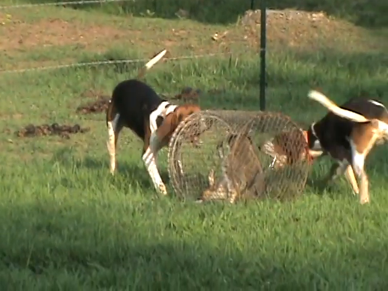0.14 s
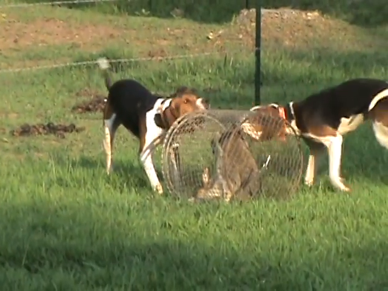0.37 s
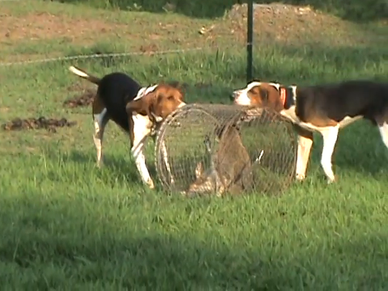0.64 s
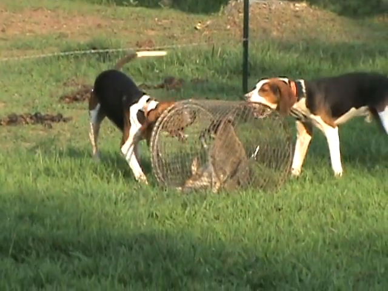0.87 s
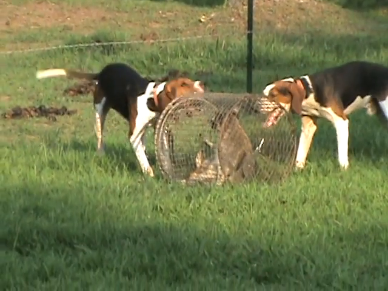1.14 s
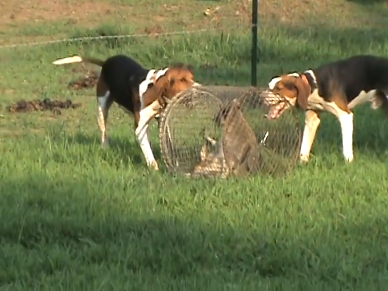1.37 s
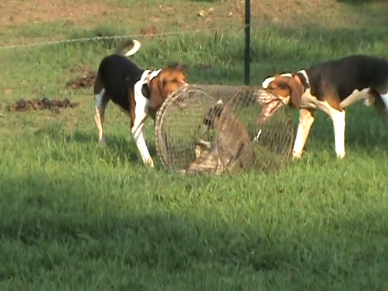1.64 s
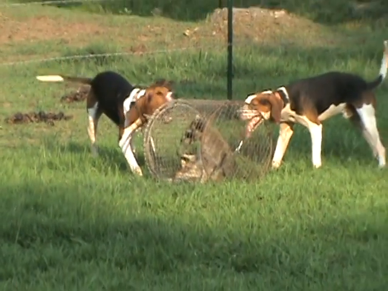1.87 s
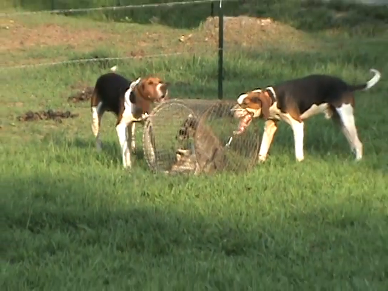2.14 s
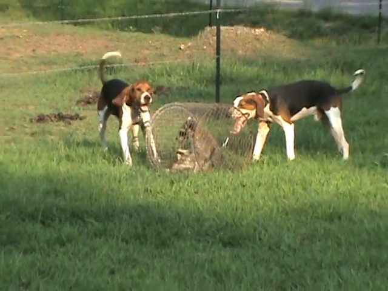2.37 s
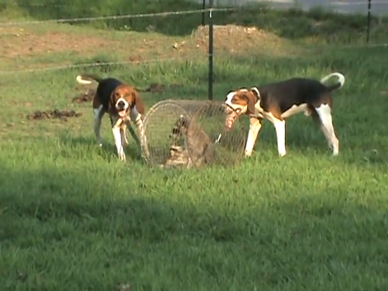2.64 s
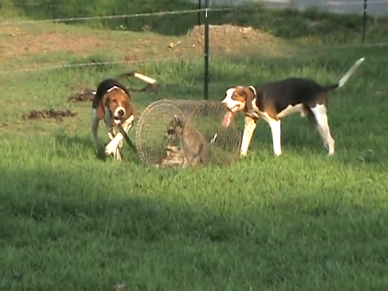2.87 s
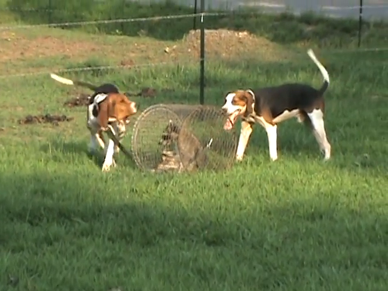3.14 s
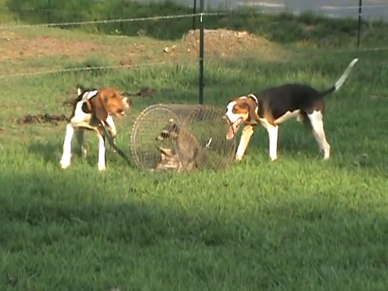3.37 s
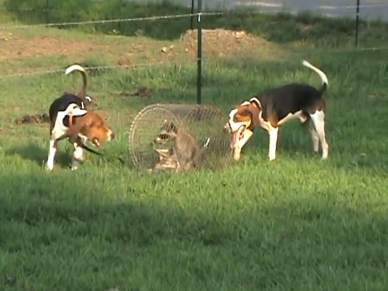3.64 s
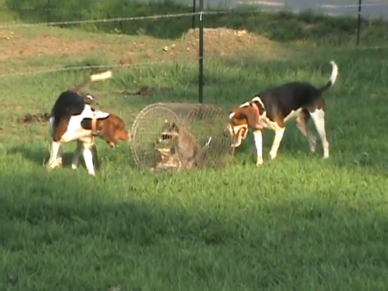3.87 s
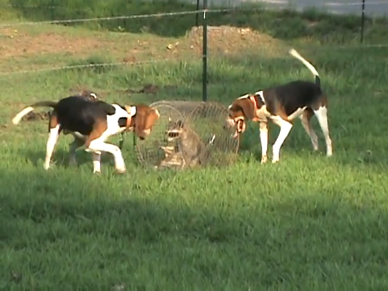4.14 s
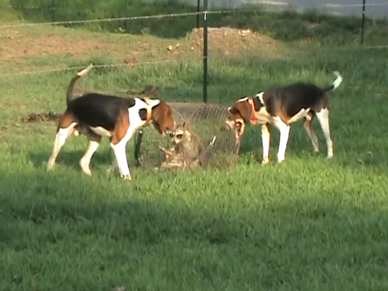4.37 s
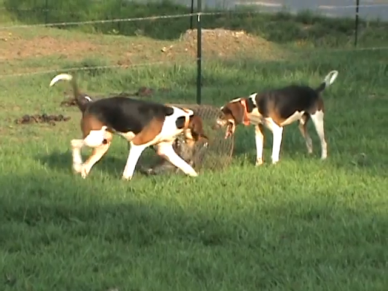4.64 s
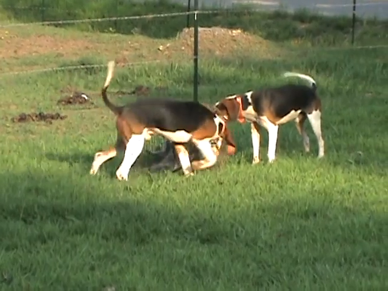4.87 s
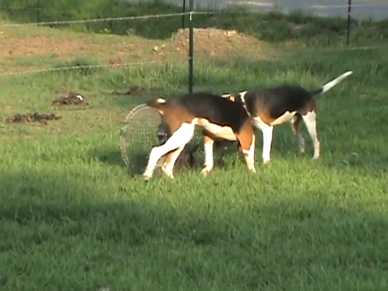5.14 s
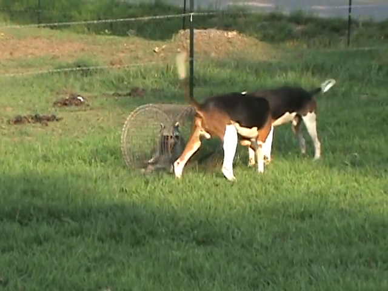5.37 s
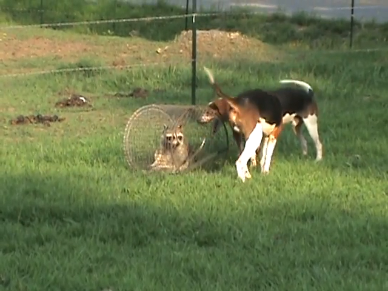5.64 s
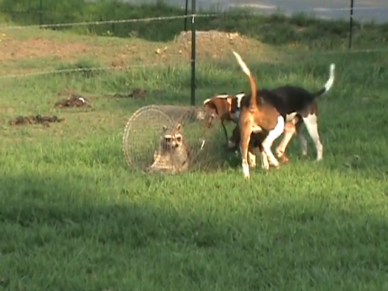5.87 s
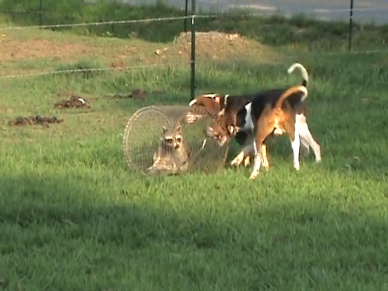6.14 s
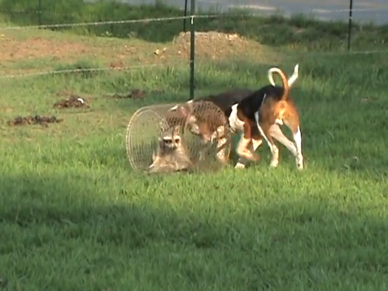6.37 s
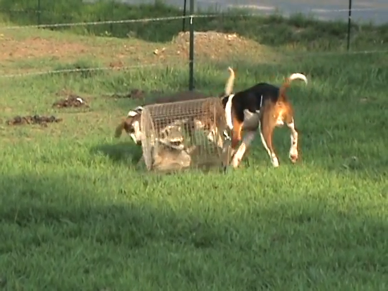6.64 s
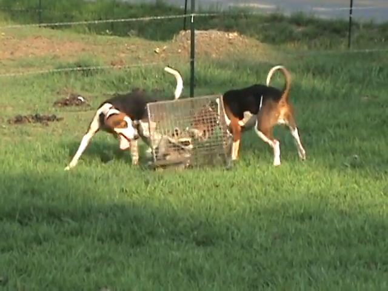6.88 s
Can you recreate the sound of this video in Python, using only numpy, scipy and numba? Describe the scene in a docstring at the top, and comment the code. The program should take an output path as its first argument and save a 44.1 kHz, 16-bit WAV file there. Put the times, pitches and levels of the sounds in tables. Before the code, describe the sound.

Two hounds a few metres away bark at a caged raccoon on an open lawn. Clear high yelps crack into hoarse chest barks that drop off fast; a long bay comes early and a shorter, higher one midway. The nearer dog is loud, the other weaker. Trees return a dull echo. Small birds chirp, insects hiss, traffic hums faintly. Stereo outdoor microphone, dogs slightly left.

```python
"""An open lawn, hounds a few metres from the microphone: most barks start as a clear high yelp, break into a
hoarse chest voice near 500 Hz and fall away, and two calls are bays; uneven fold pulses ring in throat
and mouth. Trees and banks answer with a long dull echo of decaying noise. Small birds chirp as gliding
whistles; crickets and cicadas hiss high up, the wire cage ticks once and distant traffic hums, all as
filtered noise."""
import sys
import numpy as np
from scipy import signal
from scipy.fft import rfft, irfft, next_fast_len
from scipy.io import wavfile
from scipy.ndimage import uniform_filter1d, minimum_filter1d
from numba import njit

SR = 44100
rng = np.random.default_rng(int(sys.argv[2]) if len(sys.argv) > 2 else 0)


def inscribe(sig):
    """Save sig as 16-bit PCM at rate SR to the path in sys.argv[1].

    A 1-D sig is mono; a 2-D sig holds one channel per row.
    Samples are clipped to [-1, 1] before scaling.
    """
    pcm = np.round(np.clip(np.atleast_2d(sig).T, -1, 1) * 32767)
    wavfile.write(sys.argv[1], SR, pcm.astype(np.int16))


def undo_db(level):
    """Turn decibels back into plain size, where 20 dB means ten times bigger."""
    steps = np.asarray(level, float) / 20
    return 10 ** steps


N = 308700
T = np.arange(N) / SR
EDGE_S = 0.008  # each call and chirp is held this long past both ends of its curve


def unit(x):
    """Scale to rms 1."""
    return x / np.sqrt(np.mean(x ** 2, axis=-1, keepdims=True))


def shaped(gain, count, channels=1):
    """Noise of rms 1 whose spectrum is gain(Hz)."""
    size = next_fast_len(count)
    hz = np.arange(size // 2 + 1) * SR / size + 1
    spectrum = rfft(rng.standard_normal((channels, size))) * gain(hz)
    return unit(irfft(spectrum, size)[:, :count])


def bell(hz, centre_hz, width_hz):
    """Gain of a resonance, 1 at its centre."""
    return 1 / np.sqrt(1 + ((hz - centre_hz ** 2 / hz) / width_hz) ** 2)


def on_log(hz, table):
    """Read (Hz, value) points on a log-frequency axis."""
    table_hz, values = np.transpose(table)
    return np.interp(np.log(hz), np.log(table_hz), values)


def columns(rows):
    """Curve rows as one array per column, sample by sample, held a little past both ends."""
    s, *rest = np.transpose(rows)
    t = np.arange(int((s[0] - EDGE_S) * SR), int((s[-1] + EDGE_S) * SR)) / SR
    return [np.interp(t, s, column) for column in rest]


def add(out, rows, sound, pan_db, fade_s):
    """Mix a sound in around its curve's span with soft ends; pan_db is left minus right."""
    at = int((rows[0][0] - EDGE_S) * SR)
    t = np.arange(len(sound)) / SR
    fade = np.sin(np.pi / 2 * np.clip(np.minimum(t, t[-1] - t) / fade_s, 0, 1))
    sides = undo_db(np.array([[pan_db], [-pan_db]]) / 2)
    out[:, at:at + len(sound)] += sound * fade * sides


@njit
def resonate(x, hz, width):
    """State-variable band-pass whose centre moves sample by sample, gain 1 at the centre."""
    y, band, low = np.empty(len(x)), 0., 0.
    for i in range(len(x)):
        g, k = np.tan(np.pi * hz[i] / SR), width / hz[i]
        v = (band + g * (x[i] - low)) / (1 + g * (g + k))
        band, low, y[i] = 2 * v - band, low + 2 * g * v, k * v
    return y


# Spectrum of the open air across the lawn. Each row: frequency in Hz, relative density in dB.
AIR_SPECTRUM = [(15, -36), (25, -11), (99, 2.5), (500, -3), (604, 1), (812, 5.5), (981, -3.5), (1680, 2.5),
                (2260, -5.5), (5520, -15.5), (7420, 4), (8730, -4.5), (15800, -21)]
# How alike the air is at the left and right microphone. Each row: frequency in Hz, likeness from 0 to 1.
AIR_LIKENESS = [(60, 1), (290, 0.36), (1400, 0.66), (3100, 0), (6800, 0.74), (15000, 0.66)]
AIR_DB = -48


def air():
    """Traffic, leaves and cicadas: octave-wide noise parts that waver alone, each partly shared by the sides."""
    out = 0
    every_hz = np.arange(20., 16000)
    total = np.sqrt(np.sum(undo_db(on_log(every_hz, AIR_SPECTRUM)) ** 2))
    for centre in 30 * 2 ** np.arange(0, 9.5, .5):
        def part(f):
            octave = np.cos(np.pi / 2 * np.clip(2 * np.log2(f / centre), -1, 1))
            return undo_db(on_log(f, AIR_SPECTRUM)) * octave

        mid, side = shaped(part, N, channels=2)
        like = np.clip(on_log(centre, AIR_LIKENESS), 0, 1)
        waver = undo_db(1.55 * shaped(lambda f: bell(f, 13, 33), N)[0])
        pair = np.sqrt((1 + like) / 2) * mid + np.sqrt((1 - like) / 2) * side * np.array([[1], [-1]])
        out = out + pair * waver * np.sqrt(np.sum(part(every_hz) ** 2)) / total
    return undo_db(AIR_DB) * out


# A far engine swells and fades. Each row: time in seconds, level in dB.
ENGINE_SWELL = [(0.0, -66.5), (1.9, -71.5), (2.3, -61.5), (3.1, -67), (3.5, -75), (7.0, -69.5)]


def hum():
    """Distant traffic: a narrow band of noise near 101 Hz."""
    return undo_db(np.interp(T, *np.transpose(ENGINE_SWELL))) * shaped(lambda f: bell(f, 101.0, 40) ** 2, N)


def cricket_chorus():
    """A far chorus merges into a faint narrow noise band near 4 kHz whose level trembles."""
    level = undo_db(-70.5 + 2 * shaped(lambda f: bell(f, 1.5, 3.4), N))
    return level * shaped(lambda f: bell(f, 4120, 250) ** 2, N)


def cicadas():
    """A thin buzz of noise near 14 kHz that swells late."""
    level = undo_db(-64.5 + 5.0 * np.clip((T - 5.7) / .6, 0, 1))
    return level * shaped(lambda f: bell(f, 14300, 4500) ** 2, N)


# Upper resonances of the hounds' heads. Each row: centre in Hz, width in Hz, relative level in dB.
UPPER_RESONANCES = [(3100, 700, 0), (4500, 600, -3), (5600, 700, -1), (6800, 900, -2), (8700, 1800, -8),
                    (12000, 5000, -19)]
THROAT_WIDTH_HZ, MOUTH_WIDTH_HZ = 530, 1306  # scaled by each call's own width factor
WANDER_SHARE = .06  # pitch wander for each radian of hoarseness


def upper_resonances(rush):
    """Fixed treble resonances; each flares and fades by itself as tongue and lips move."""
    flare_db = 2.5 * shaped(lambda f: bell(f, 8, 18) ** 2, len(rush), channels=len(UPPER_RESONANCES))
    top = 0
    for n, (centre, width, db) in enumerate(UPPER_RESONANCES):
        centre_hz, width_hz = np.full(len(rush), float(centre)), float(width)
        ringing = resonate(resonate(rush, centre_hz, width_hz), centre_hz, width_hz)
        top = top + (-1) ** n * undo_db(db + flare_db[n]) * ringing
    return unit(top)


def voice(rows, hoarse, half_db, break_s, wide):
    """Uneven fold pulses ring through throat, mouth and upper resonances.

    Each row: time in seconds, pitch in Hz, level in dB, throat in Hz, mouth in Hz, mouth in dB, treble in dB."""
    hz, level_db, throat_hz, mouth_hz, mouth_db, treble_db = columns(rows)
    count = len(hz)
    hz = hz * (1 + WANDER_SHARE * hoarse * shaped(lambda f: bell(f, 14, 25) ** 2, count)[0])
    slip, flutter = shaped(lambda f: bell(f, 40, 110) ** 2, count, channels=2)
    throat_width, mouth_width = wide * THROAT_WIDTH_HZ, wide * MOUTH_WIDTH_HZ
    broken = np.clip(np.arange(count) / SR / max(break_s, 1e-4), 0, 1) ** 2
    # as the pitch falls low the throat closes down onto it
    held = np.clip((hz - 390) / 35, 0, 1)
    throat_hz = hz + (throat_hz - hz) * held
    # the rasp comes in bursts with clearer moments between
    bursts = undo_db(4 * shaped(lambda f: bell(f, 15, 25) ** 2, count)[0] - 1)
    hoarse = hoarse * bursts * broken * (.3 + .7 * held)
    # folds that close early or late smear the upper lines most
    phase = 2 * np.pi * np.cumsum(hz) / SR + hoarse * slip
    folds, low_power, high_power = 0, 0, 0
    for k in np.arange(.5, 13000 / hz.max(), .5):
        # half-pitch lines make every second cycle differ
        line = 1 if k % 1 == 0 else undo_db(half_db) * broken
        folds = folds + line * np.sqrt(2) * np.cos(k * phase)
        low_power = low_power + (line * bell(k * hz, throat_hz, throat_width) ** 2) ** 2
        high_power = high_power + (line * bell(k * hz, mouth_hz, mouth_width) ** 3) ** 2
    shimmer = .9 * hoarse + .05
    folds = folds * (1 + shimmer * flutter) / np.sqrt(1 + shimmer ** 2)
    low = resonate(resonate(folds, throat_hz, throat_width), throat_hz, throat_width)
    high = folds
    for _ in range(3):
        high = resonate(high, mouth_hz, mouth_width)
    # air rushes through once a cycle and joins the pulses in the treble
    breath = .85 * rng.standard_normal(count) * (1 + .8 * np.cos(phase))
    top = upper_resonances(unit(folds) + breath)
    mouth = np.clip(undo_db(mouth_db), 0, .97)
    body = np.sqrt(1 - mouth ** 2) * low / np.sqrt(low_power) - mouth * high / np.sqrt(high_power)
    # little passes the muzzle between the mouth resonance and the upper ones
    body = signal.sosfilt(signal.butter(5, 2350, fs=SR, output="sos"), body)
    return undo_db(level_db) * (body + undo_db(treble_db) * top)


# The near and the far hound. Each entry: left minus right in dB, chest mouth resonance in Hz,
# share of pitch left after the fall, start of a yelp against its attack's end in dB.
HOUND = {"near": (2, 1537, 0.58, -3), "far": (4, 1352, 0.86, -4)}
YELP_ATTACK_S, YELP_THROAT_HZ, OPEN_MOUTH_HZ = .018, 668, 1784


def clear_note(who, start, end, first_hz, held_hz, last_hz, peak_db, end_db, mouth_db, treble_db):
    """The throat follows the pitch; the mouth of a high yelp rings on its second line, else it stays open."""
    s = np.array([start, start + YELP_ATTACK_S, end])
    hz = np.array([first_hz, held_hz, last_hz])
    mouth = 2 * hz if held_hz > 560 else OPEN_MOUTH_HZ + 0 * hz
    level = [peak_db + HOUND[who][3], peak_db, end_db]
    throat = np.maximum(hz, YELP_THROAT_HZ)
    return np.transpose([s, hz, level, throat, mouth, mouth_db + 0 * s, treble_db + 0 * s])


# Clear notes: high yelps, and two low open-mouthed notes near 460-490 Hz. Each row: hound,
# start in seconds, end in seconds, first pitch in Hz, pitch after the attack in Hz, last pitch in Hz,
# level after the attack in dB, end level in dB, mouth in dB, treble in dB.
CLEAR_NOTES = [("near", .123, .15, 725, 790, 815, -19.5, -25, -6.5, -20.5),
               ("near", .138, .195, 660, 630, 586, -22.5, -12.5, -17, -26.5),
               ("near", .194, .241, 736, 780, 848, -19, -18.5, -4, -25),
               ("near", 0.95, .998, 750, 772, 786, -20, -24.5, -4, -18),
               ("near", 1.005, 1.038, 457, 463, 467, -8, -17, -1.3, -22),
               ("far", 1.544, 1.598, 700, 690, 606, -27.5, -25, -0.89, -24.5),
               ("near", 1.933, 1.978, 785, 793, 805, -23, -16.5, -2.1, -18.5),
               ("far", 2.444, 2.494, 645, 630, 625, -25.5, -29.5, -1.1, -32),
               ("far", 2.902, 2.954, 650, 625, 605, -28, -30, -1, -23),
               ("near", 3.168, 3.294, 780, 876, 835, -21.5, -13.5, -2.3, -24),
               ("near", 5.134, 5.168, 712, 715, 796, -13, -26.5, -37, -36),
               ("far", 5.935, 5.958, 820, 811, 1000, -31, -29.5, -11, -19),
               ("near", 6.221, 6.258, 775, 761, 762, -14.5, -16.5, -24, -25),
               ("near", 6.266, 6.34, 476, 484, 486, -14, -17, -2.5, -20)]
CLEAR_HOARSE, CLEAR_HALF_DB, CLEAR_WIDE = .045, -20, 0.91  # slip in radians, half-pitch lines, width factor


def clear_notes():
    """Nearly even fold beats give clear notes, each from its hound's side."""
    out = np.zeros((2, N))
    for row in CLEAR_NOTES:
        rows = clear_note(*row)
        sound = voice(rows, CLEAR_HOARSE, CLEAR_HALF_DB, .02, CLEAR_WIDE)
        add(out, rows, sound, HOUND[row[0]][0], fade_s=.012)
    return out


LOWEST_MOUTH_HZ = 1380


def bay(rows, multiple):
    """A call whose mouth resonance rides on the pitch."""
    s, hz, level, throat, mouth_db, treble_db = np.transpose(rows)
    mouth = np.maximum(multiple * hz, LOWEST_MOUTH_HZ)
    return np.transpose([s, hz, level, throat, mouth, mouth_db, treble_db])


# Curves of two bays and a short second voice that sounds beneath the later one.
# Each row: time in seconds, pitch in Hz, level in dB, throat in Hz, mouth in dB, treble in dB.
BAYS = [
    [(.123, 367.8, -30, 720, -20, -22), (.138, 400, -26, 700, -1, -22),
     (.148, 414.5, -19.5, 665, -1.5, -17), (.188, 432.3, -21.5, 580, -9.5, -27),
     (.22, 439.7, -19.5, 420, -2, -19), (.49, 435.8, -26.5, 480, -4.5, -25),
     (.58, 427.2, -24, 460, -1.5, -31), (.66, 434, -22.5, 452, -2.5, -29.5),
     (.83, 449.7, -21.5, 466, -2.1, -25), (.875, 456, -25.5, 449, -2.5, -22),
     (.9, 378.7, -32, 451, -5.5, -28), (.93, 235, -52, 467, -7, -30)],
    [(4.038, 669, -18.5, 680, -40, -40), (4.076, 780.5, -32, 664, -11.5, -19.5),
     (4.16, 873.7, -19.5, 806, 0, -19.5), (4.27, 810, -18.5, 710, -1.5, -27.5),
     (4.294, 700.6, -30.5, 623, -3.5, -25), (4.31, 521, -23, 559.7, -4.5, -30),
     (4.35, 241, -44, 560, -5, -26)],
    [(4.1, 589.6, -42, 575, -19, -45), (4.125, 614, -24.5, 575, -0.5, -30), (4.15, 525, -35, 540, -18, -45),
     (4.2, 501, -35, 493, -10, -35), (4.285, 495, -25, 503, -4.5, -37), (4.295, 450, -47, 494, -21, -35)],
]
# Manner of each curve. Each row: mouth resonance over pitch, half-pitch lines in dB, left minus right in dB,
# time until the voice breaks in seconds, resonance width factor.
BAY_MANNER = [(3.42, 3.5, 1.5, 0.11, .42), (1.96, -9.5, 2, .22, 0.86), (3.1, -21, 1.5, 0.021, 1)]
# How far the folds slip from an even beat. Each entry: slip of one curve in radians, before rasp bursts.
BAY_HOARSE = [.04, .07, .1]


def bays():
    """Two bays and a short second voice beneath the later one; their folds slip a little from an even beat."""
    out = np.zeros((2, N))
    for curve, manner, hoarse in zip(BAYS, BAY_MANNER, BAY_HOARSE):
        multiple, half_db, pan_db, break_s, wide = manner
        rows = bay(curve, multiple)
        add(out, rows, voice(rows, hoarse, half_db, break_s, wide), pan_db, fade_s=.012)
    return out


# the jaw closes after the break: throat and mouth sink from this far above
CLOSE_S, OPEN_THROAT_HZ, OPEN_ABOVE_HZ = 0.0401, 121, 270
FALL_DB, FALL_MOUTH_HZ, FALL_MOUTH_DB = -22, 78, -9
FALL_BEND = .46  # share of the pitch fall done at half its time


def chest(who, start, fall, fall_s, hz, sag_hz, peak_db, held_db,
          break_share, break_db, throat, mouth_db, treble_db):
    """Break with the jaw open, hold as pitch moves, then fall away ever faster as the mouth shuts."""
    _, mouth, left, _ = HOUND[who]
    shut = mouth - FALL_MOUTH_HZ
    half_fall_hz = (1 - FALL_BEND * (1 - left)) * sag_hz
    return [(start, break_share * hz, peak_db + break_db, throat + OPEN_THROAT_HZ, mouth + OPEN_ABOVE_HZ,
             mouth_db, treble_db),
            (start + CLOSE_S, hz, peak_db, throat, mouth, mouth_db, treble_db),
            (fall, sag_hz, held_db, throat, shut, mouth_db, treble_db),
            (fall + fall_s / 2, half_fall_hz, held_db + 0.33 * FALL_DB, throat, shut,
             mouth_db + 0.22 * FALL_MOUTH_DB, treble_db),
            (fall + fall_s, left * sag_hz, held_db + FALL_DB, throat, shut,
             mouth_db + FALL_MOUTH_DB, treble_db)]


# Hoarse chest voices. Each row: hound, start in seconds, time the fall begins in seconds,
# length of the fall in seconds, pitch in Hz, pitch as the fall begins in Hz,
# level once the jaw has closed in dB, level before the fall in dB.
CHESTS = [("near", .248, .44, .06, 502, 482, -12, -16.5),
          ("near", 1.046, 1.222, .075, 508, 460, -13, -20.5),
          ("far", 1.606, 1.71, .08, 476, 485, -24.5, -28), ("near", 1.986, 2.14, .065, 505, 470, -15, -19),
          ("far", 2.501, 2.577, 0.07, 447, 430, -20, -31), ("far", 2.961, 3.03, .08, 525, 500, -25.5, -28),
          ("near", 3.301, 3.367, .065, 503, 497, -16.5, -20),
          ("near", 5.176, 5.328, .05, 513, 496, -14.5, -21), ("far", 5.966, 6.104, .06, 510, 530, -28, -31),
          ("near", 6.346, 6.46, .085, 487, 470, -13, -18.5)]
# Manner of each chest voice. Each row: share of pitch at the break, break against the closed-jaw level in dB,
# throat in Hz, mouth in dB, treble in dB, half-pitch lines in dB, resonance width factor.
CHEST_MANNER = [(.97, 9, 527, -2.5, -24, -10.5, 0.77), (.99, -4.5, 530, -3, -23.5, -9.5, 0.63),
                (1.07, -2.5, 720, -17, -27, -13.5, 1), (.95, 8, 566, -3, -22, -15.5, 0.86),
                (1.07, -7, 685, -8.5, -30, -14.5, 0.99), (1.1, .6, 505, -9, -27, -13.5, 0.84),
                (.98, 3, 560, -2.5, -24.5, -14.5, 0.89), (.93, -3, 566, -5.5, -27, -14.5, 0.8),
                (.99, 1, 742, -15, -23, -15.5, 1), (1.03, 2.5, 513, -5, -22.5, -12.5, 0.73)]
# How far the folds slip from an even beat. Each entry: slip of one chest voice in radians, before rasp bursts.
CHEST_HOARSE = [.32, .11, .24, .44, .18, .3, .44, .26, .33, .37]
CHEST_BREAK_S = 0.0093


def chest_voices():
    """Folds that slip far from an even beat make the hoarse part of each bark."""
    out = np.zeros((2, N))
    for row, manner, hoarse in zip(CHESTS, CHEST_MANNER, CHEST_HOARSE):
        *colour, half_db, wide = manner
        rows = chest(*row, *colour)
        sound = voice(rows, hoarse, half_db, CHEST_BREAK_S, wide)
        add(out, rows, sound, HOUND[row[0]][0], fade_s=.012)
    return out


def hounds():
    """Clear notes, bays and chest voices, each from its side."""
    return clear_notes() + bays() + chest_voices()


# Returns from trees and banks around the lawn. Each row: band centre in Hz,
# time to decay by 60 dB in seconds, starting level in dB.
ECHO = [(525, 1.244, -62), (913, 1.06, -57.5), (1920, 0.83, -63.5), (3740, 0.91, -54.5), (7060, .4, -63)]


def echo(x):
    """Scattered returns: a noise tail that builds quickly and dulls as it decays, one stronger far bank."""
    t = np.arange(int(1.6 * SR)) / SR
    tail = 0
    for hz, t60, db in ECHO:
        mid, side = shaped(lambda f: bell(f, hz, 1.0 * hz) ** 2, len(t), channels=2)
        tail = tail + undo_db(db - 60 * t / t60) * (mid + 0.27 * side * np.array([[1], [-1]]))
    far_bank = undo_db(0.89 * np.exp(-((t - .3) / 0.011) ** 2))
    tail = tail * np.clip(t / 0.022, 0, 1) * far_bank
    return signal.fftconvolve(x.mean(axis=0, keepdims=True), tail, axes=1)[:, :N]


# Chirps of small birds. Each row: start in seconds, length in seconds, first pitch in Hz, last pitch in Hz,
# upward flick at the middle in Hz, level in dB before the edge and flick losses.
BIRDS = [(0.869, 0.041, 3360, 3566, 15, -49), (1.315, 0.029, 3290, 3100, 150, -53.5),
         (2.824, .052, 3240, 2850, 126, -45.5), (4.555, 0.041, 3200, 3220, 87, -56.5),
         (4.91, 0.095, 3620, 3360, 20, -55.5), (5.505, .03, 3150, 3180, 20, -61),
         (5.55, .1, 3250, 3150, 30, -55.5), (5.716, 0.051, 3430, 3330, 330, -37),
         (5.922, 0.13, 3530, 3610, 280, -31.5), (6.899, .046, 3480, 3360, 450, -38.5)]
CHIRP_EDGE_DB, FLICK_DB_PER_KHZ, FLICK_SHARP, CHIRP_POINTS = -7.5, -43, 3.16, 17


def birds():
    """Pure whistles that flick up in the middle, thinner at the top; their level trembles."""
    out, u = np.zeros((2, N)), np.linspace(0, 1, CHIRP_POINTS)
    edge = np.abs(2 * u - 1)
    for start, length, from_hz, to_hz, flick_hz, db in BIRDS:
        flick = flick_hz * (1 - edge) ** FLICK_SHARP
        glide = from_hz + (to_hz - from_hz) * u + flick
        level = db + CHIRP_EDGE_DB * edge ** 2 + FLICK_DB_PER_KHZ * flick / 1000
        rows = np.transpose([start + length * u, glide, level])
        hz, level_db = columns(rows)
        tremble_db = 2 * shaped(lambda f: bell(f, 25, 40) ** 2, len(hz))[0]
        whistle = np.sqrt(2) * np.sin(2 * np.pi * np.cumsum(hz) / SR)
        add(out, rows, undo_db(level_db + tremble_db) * whistle, 1.5, fade_s=.012)
    return out


CRICKET_FROM_S, CRICKET_EVERY_S, CRICKET_SCATTER_S = 2.19, .211, 0.021


def crickets():
    """Short trills of noise near 9 kHz, throbbing 170 times a second."""
    starts = np.arange(CRICKET_FROM_S, N / SR, CRICKET_EVERY_S)
    starts = starts + CRICKET_SCATTER_S * rng.standard_normal(len(starts))
    swell = sum(np.exp(-((T - s - .03) / 0.023) ** 4) for s in starts)
    throb = 1 + .5 * np.sin(2 * np.pi * 170 * T)
    return undo_db(-58) * swell * throb * shaped(lambda f: bell(f, 9190, 220) ** 2, N)


# The wire cage ticks. Each row: time in seconds, level at the onset in dB.
CAGE_TICKS = [(4.474, -43.5)]


def cage():
    """A short broad click: noise that starts at once and dies within milliseconds."""
    clicks = sum(undo_db(db) * (T > s) * np.exp(-np.abs(T - s) / 0.0036) for s, db in CAGE_TICKS)
    return clicks * shaped(lambda f: bell(f, 3600, 4000) ** 2, N)


def scene():
    """Hounds and birds with their echo over the background."""
    dogs, chirps = hounds(), birds()
    returns = echo(dogs + undo_db(-8.5) * chirps)
    insects = crickets() + cicadas() + cricket_chorus()
    return dogs + chirps + returns + cage() + insects + air() + hum()


def top_cut(x):
    """Nothing passes above the cut-off."""
    return signal.sosfilt(signal.butter(12, 16310, fs=SR, output="sos"), x)


def record(dry):
    """A quick limiter holds the loudest peaks; the two microphone ports differ slightly in phase."""
    peak = -minimum_filter1d(-np.abs(dry).max(axis=0), size=200)
    gain = uniform_filter1d(np.minimum(1, .5 / (peak + 1e-9)), size=200)
    soft = dry * gain
    left = np.roll(soft[0], 1)
    right = signal.lfilter([.06, 1], [1, .06], soft[1])  # all-pass, close to one sample late
    return top_cut(np.array([left, right]))


dry = scene()
out = record(dry)
inscribe(out)
```